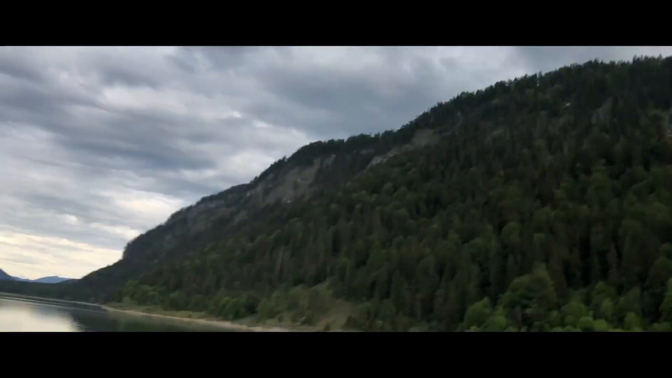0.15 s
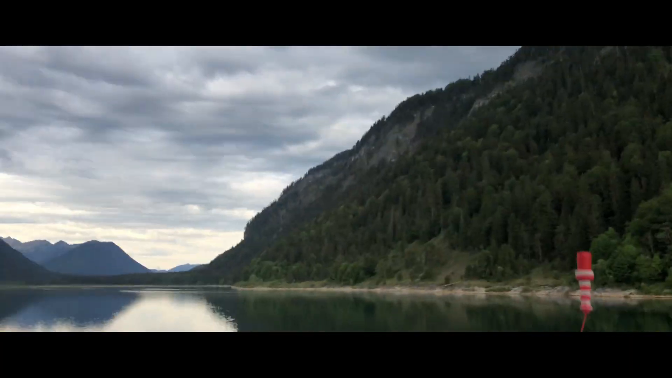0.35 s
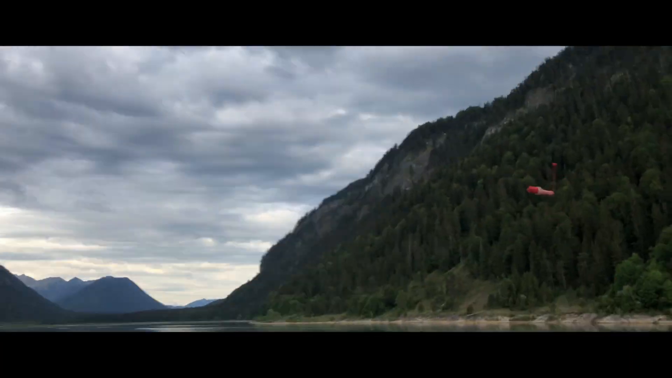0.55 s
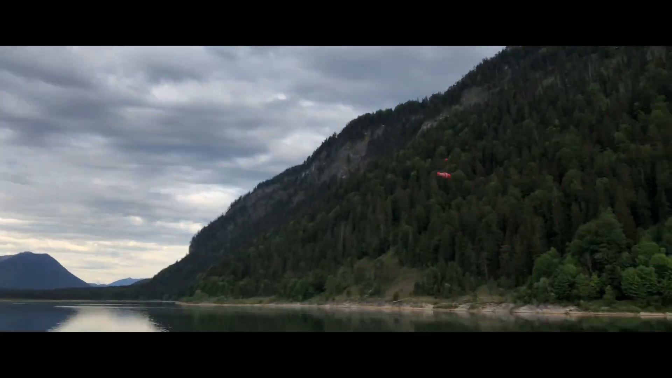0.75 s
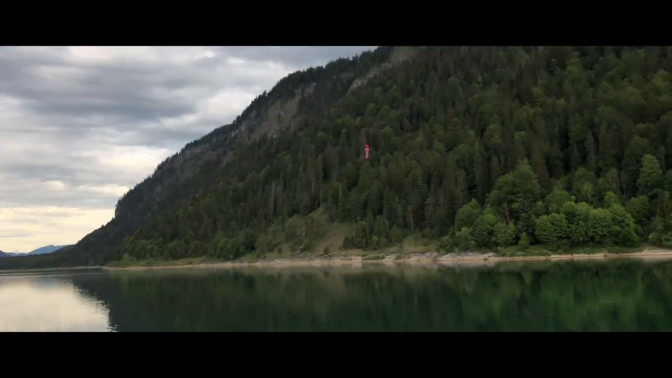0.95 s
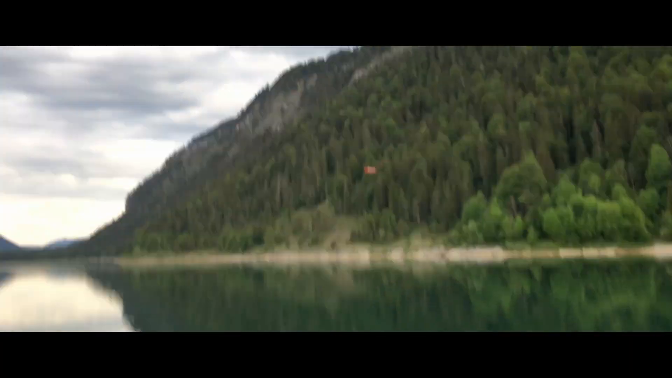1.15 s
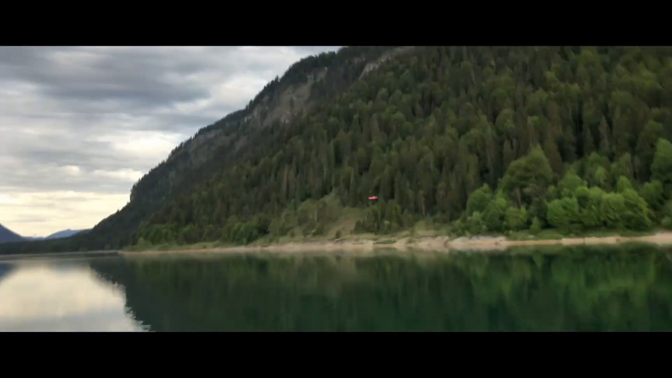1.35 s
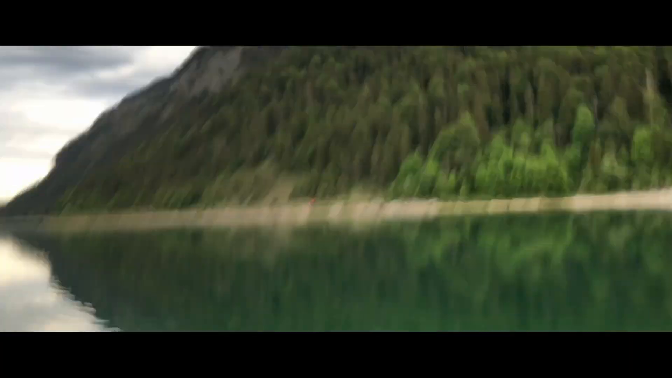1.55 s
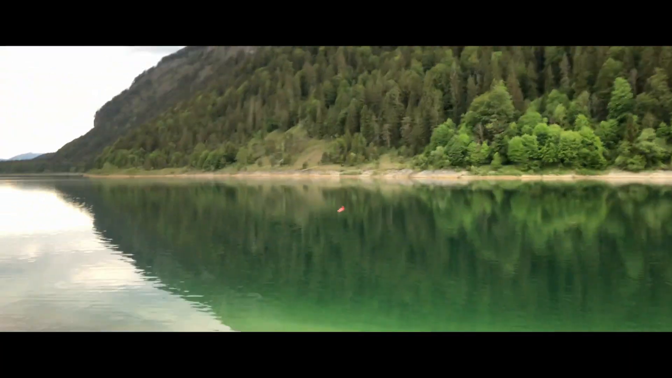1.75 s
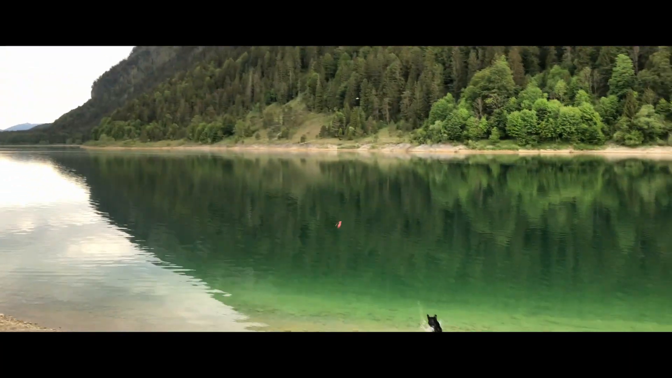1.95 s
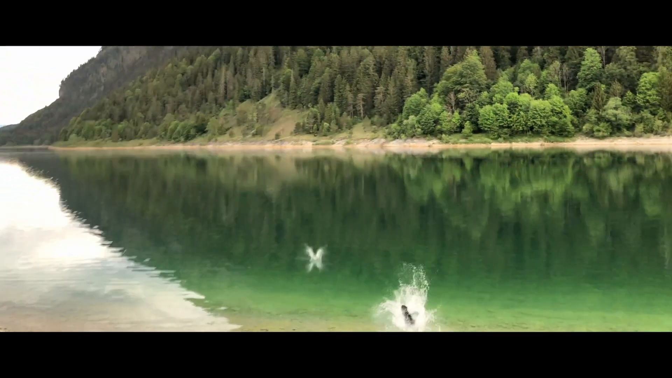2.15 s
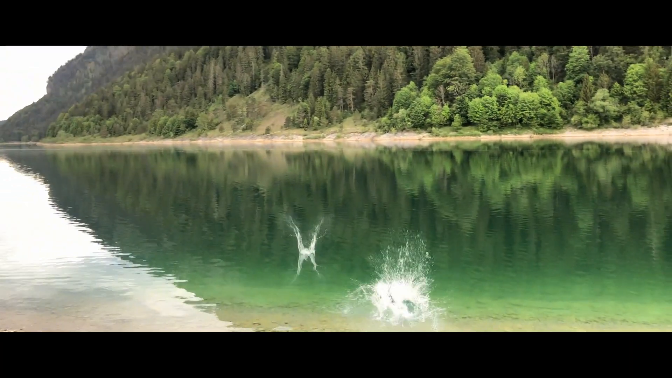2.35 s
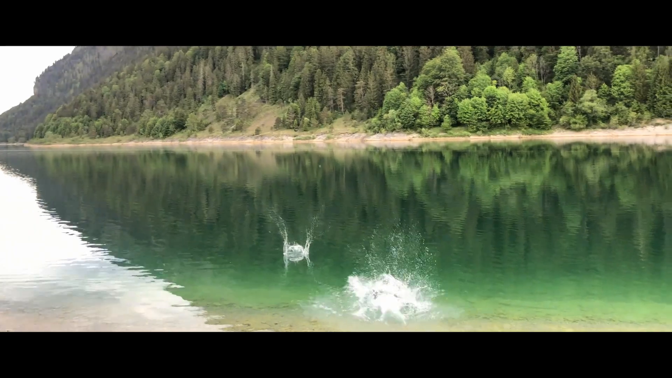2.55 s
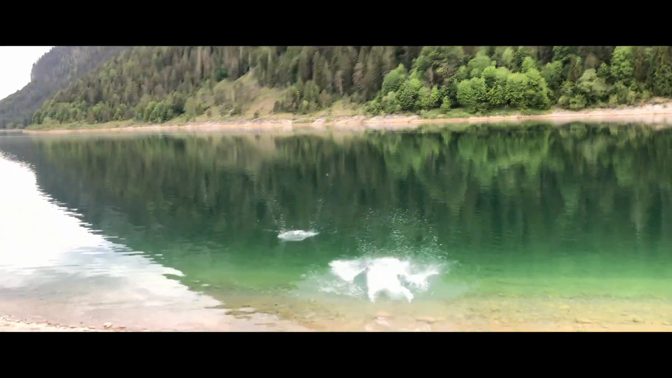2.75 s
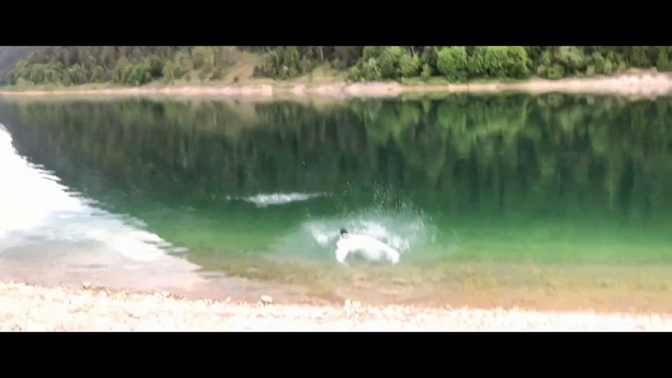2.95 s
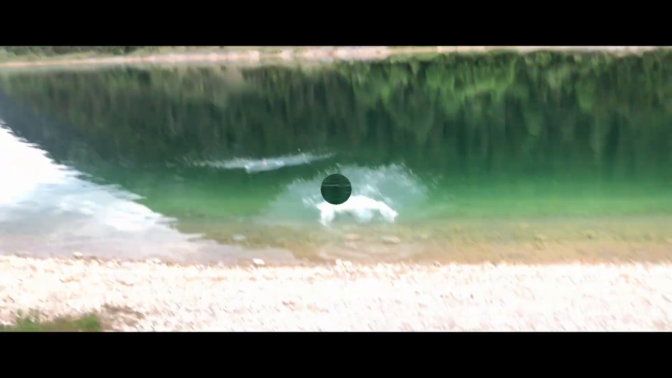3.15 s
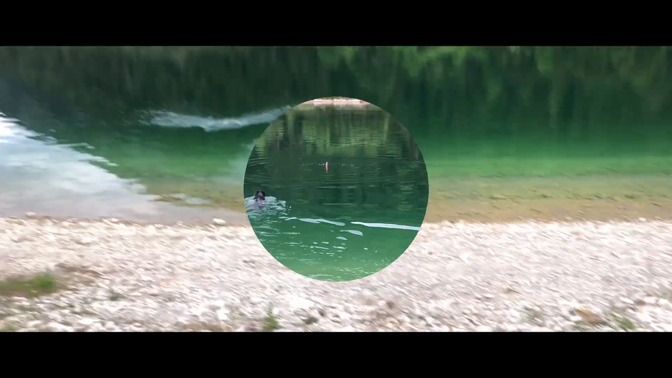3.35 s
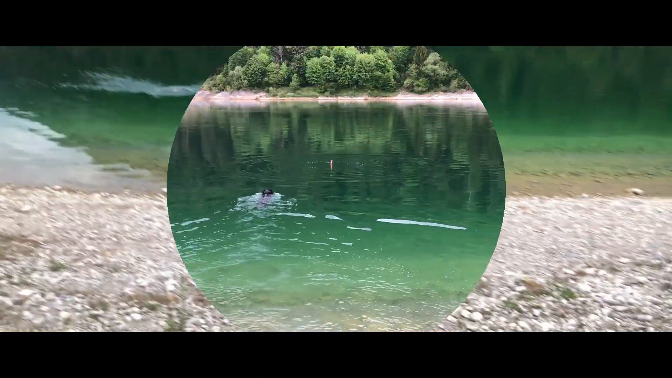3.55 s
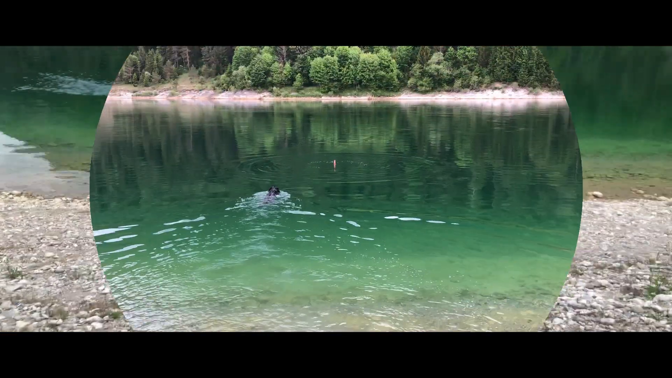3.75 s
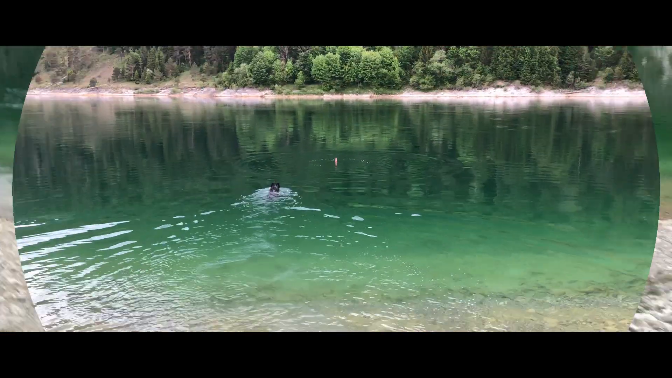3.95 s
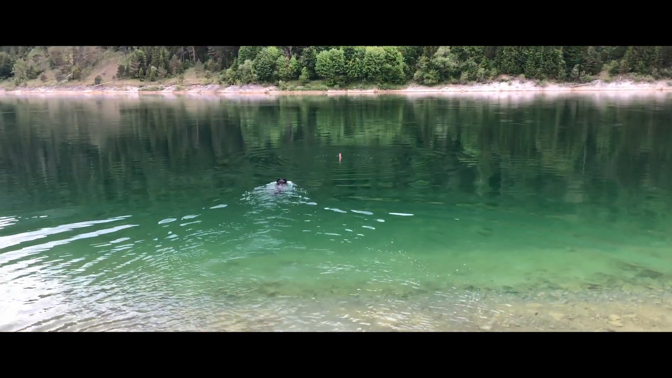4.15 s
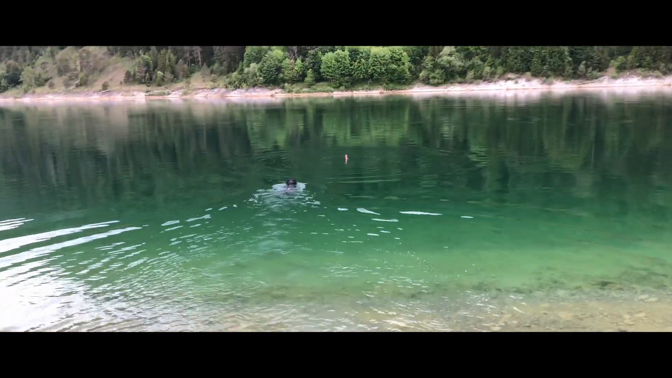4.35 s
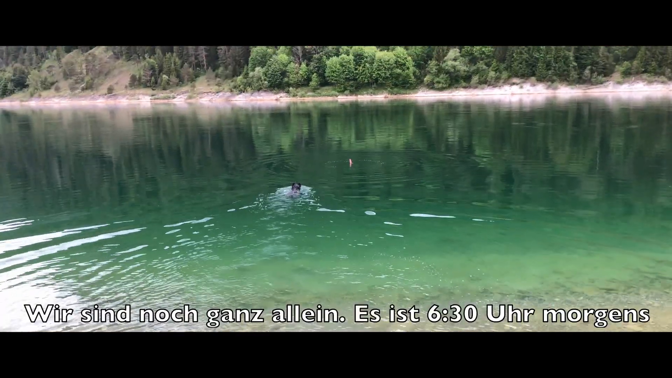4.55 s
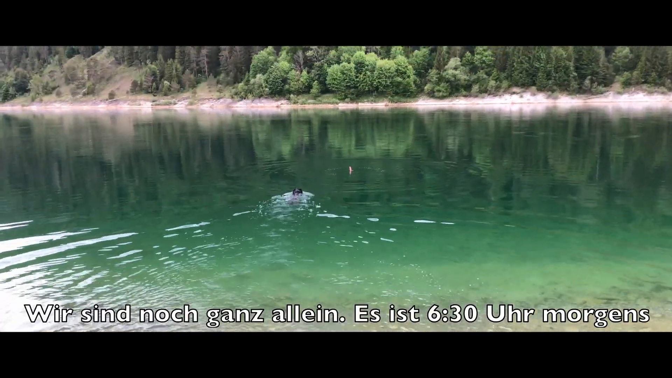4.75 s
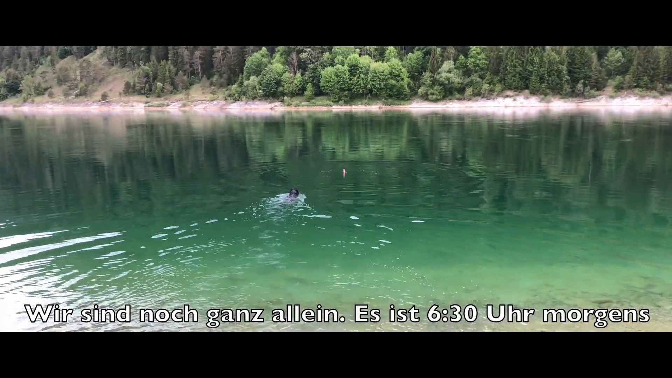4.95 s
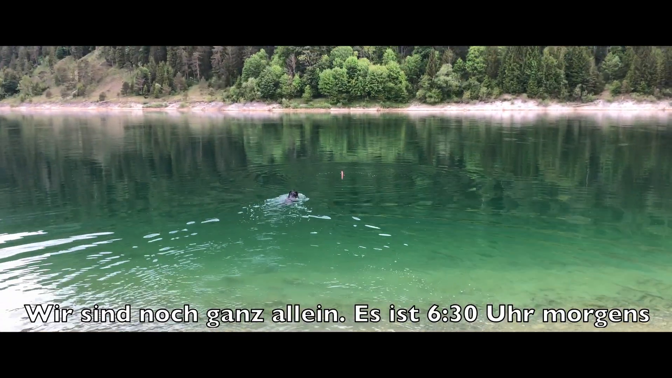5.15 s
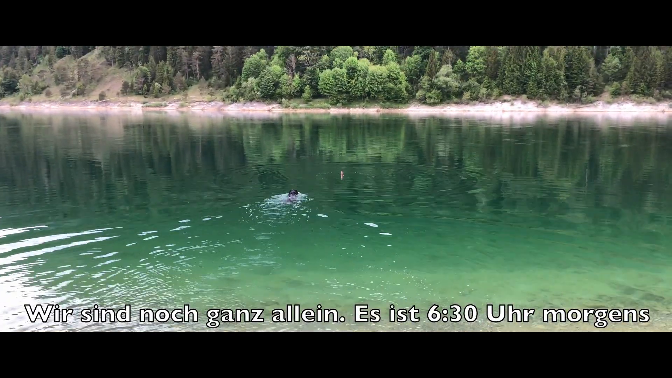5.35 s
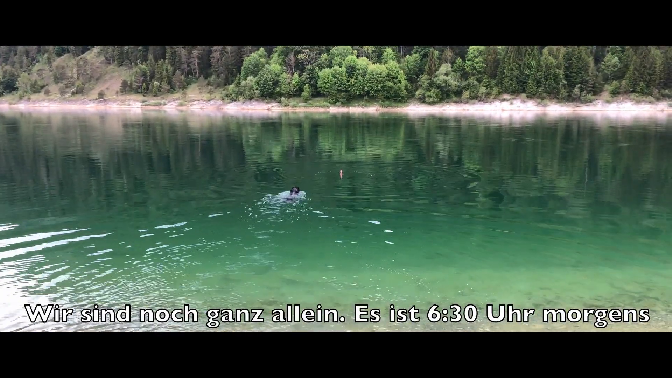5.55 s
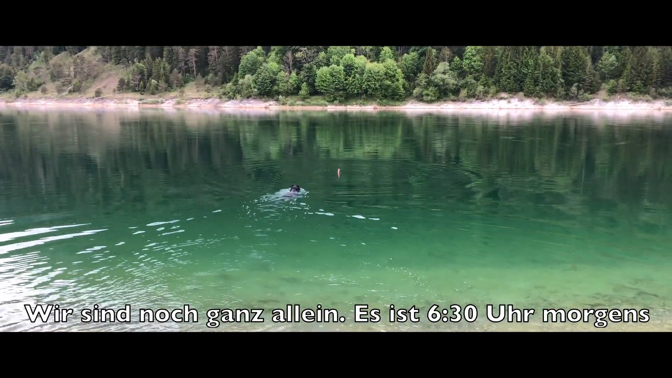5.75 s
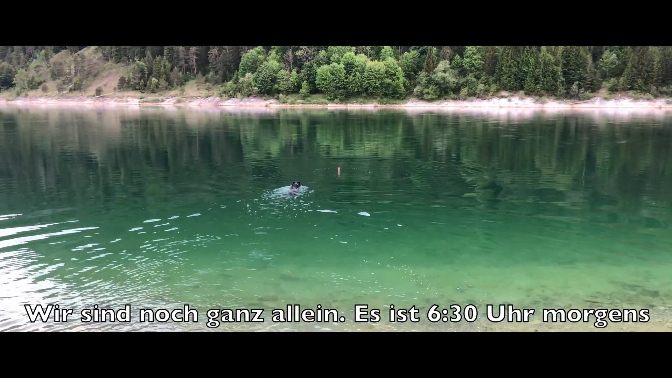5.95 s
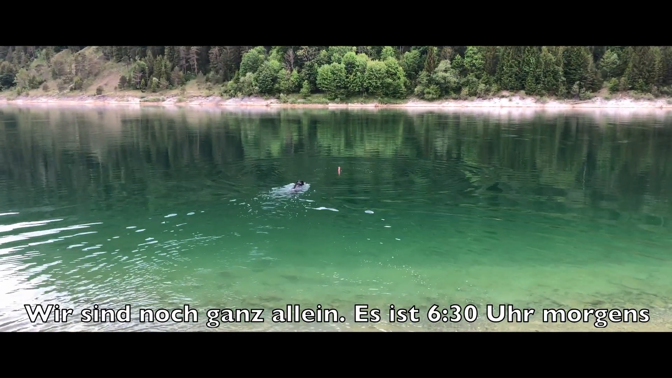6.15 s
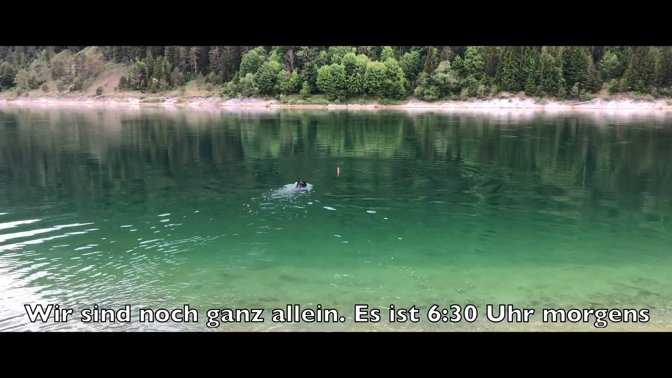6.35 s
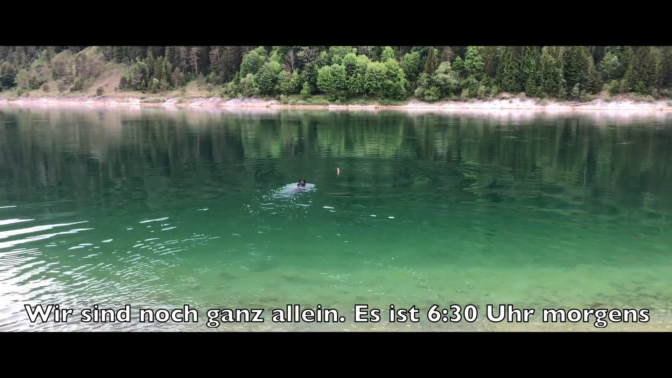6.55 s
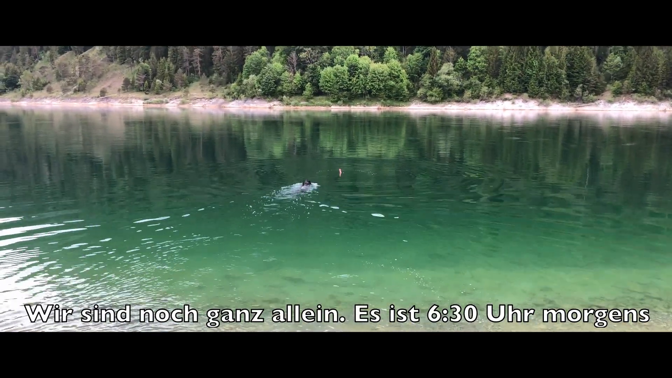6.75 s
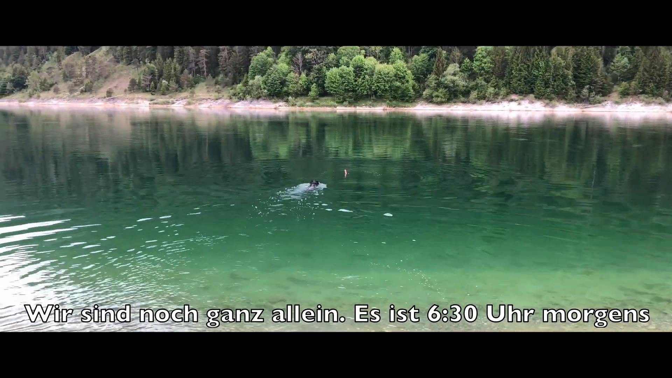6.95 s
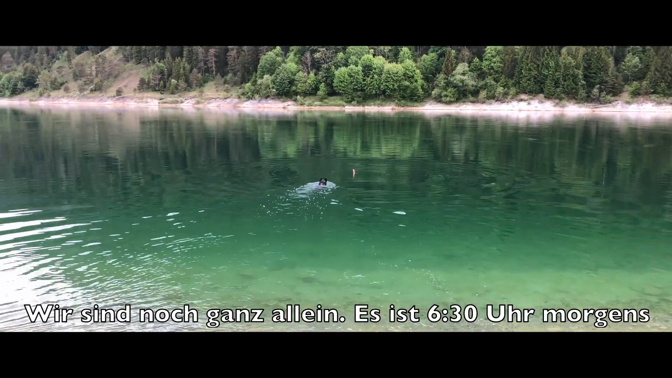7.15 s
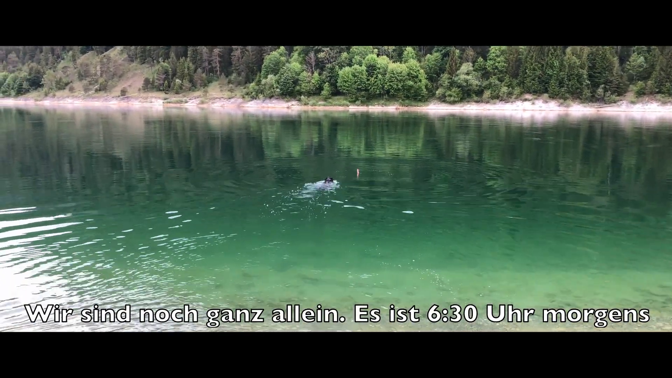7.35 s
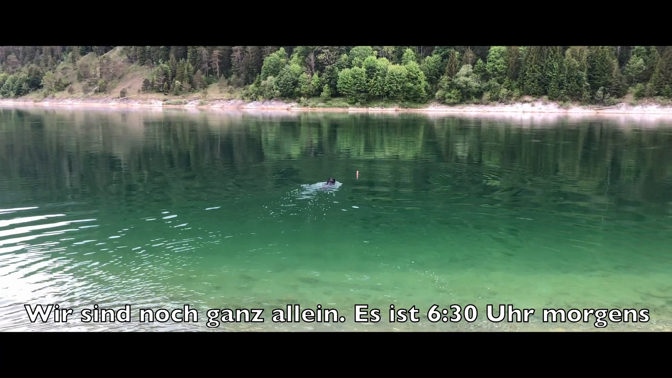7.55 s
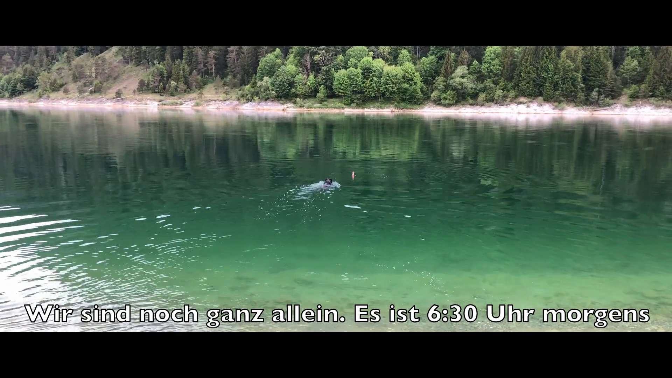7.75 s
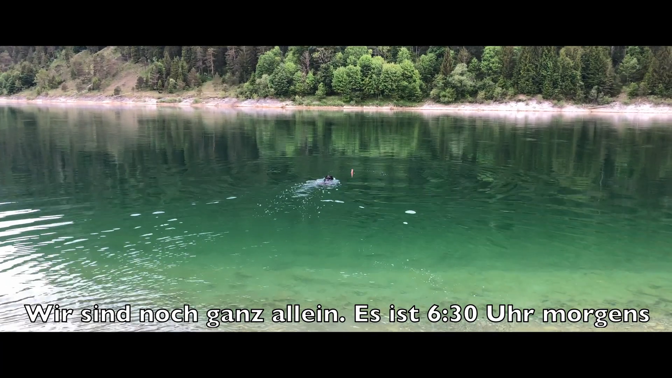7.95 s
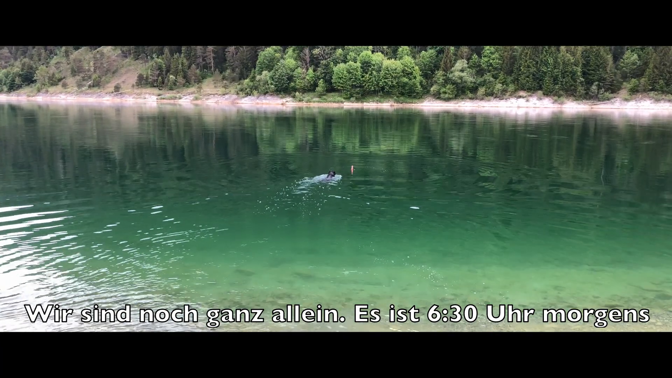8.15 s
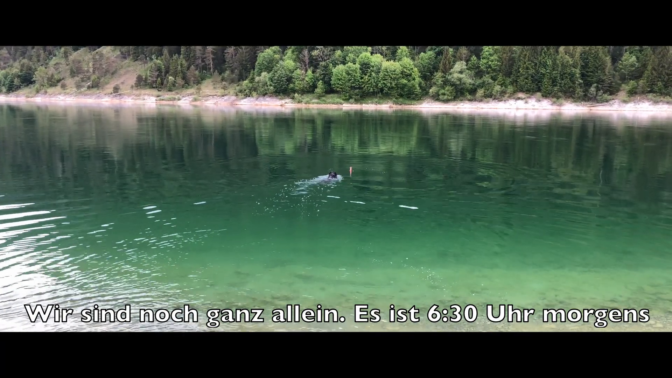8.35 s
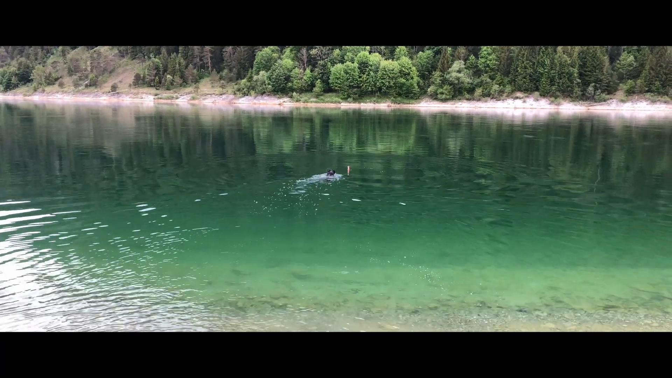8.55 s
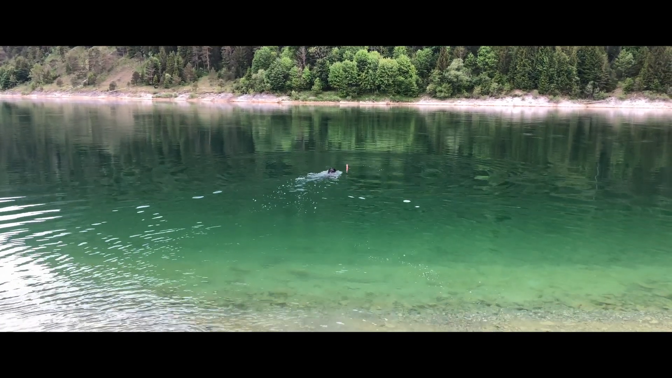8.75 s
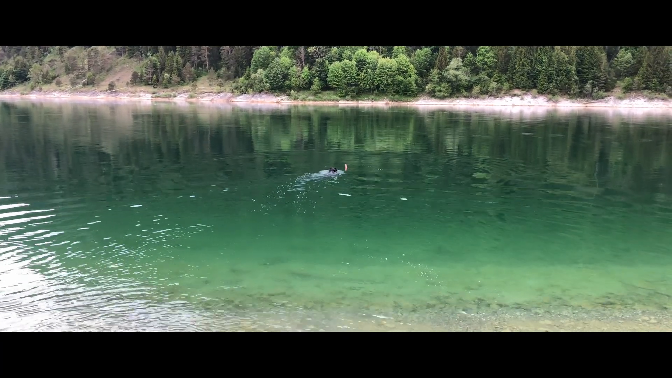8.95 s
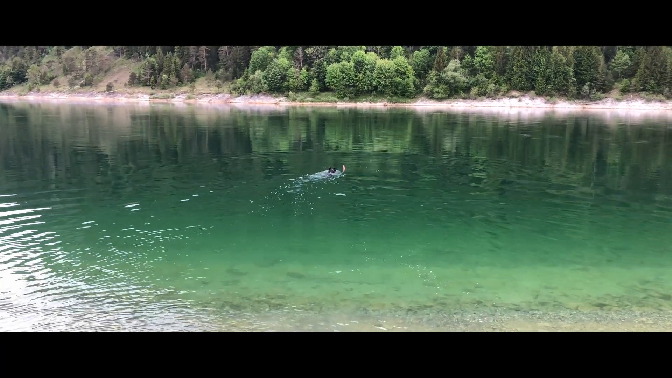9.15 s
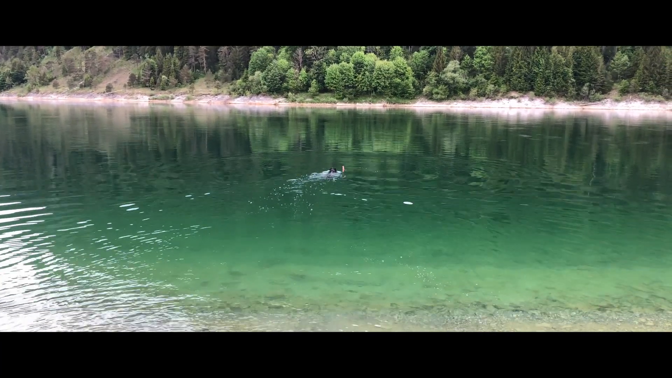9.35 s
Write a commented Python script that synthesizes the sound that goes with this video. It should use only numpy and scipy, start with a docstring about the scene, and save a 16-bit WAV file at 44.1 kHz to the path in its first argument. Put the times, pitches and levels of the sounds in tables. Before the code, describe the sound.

A dog sprints across stones, knocking pebbles brightly and grinding gravel, then plunges with deep gulps, foam and pattering spray. The rush cuts off suddenly to a soft, open lakeside: irregular paw ripples, tiny bubbles, single drips and short gurgling breaths at the waterline. Distant birds whistle with a wooded echo over still air and a low faint drone. Single microphone.

```python
"""Pebbles clack and crunch under a dog racing over a beach after a thrown toy, then it plunges into a calm lake.
Struck stones are short ringing modes; gravel, churned water and falling spray are swarms of ringing grains.
The rush cuts off, and the dog is swimming farther out: about once a second it huffs at the waterline, in puffs
of banded noise with a gurgle of rising tones. Its paws stir up bubbles and drops, and faint birds whistle.
A low distant drone and still air, both filtered noise, lie under it all. One microphone."""
import sys
import numpy as np
from scipy import signal
from scipy.io import wavfile

SR = 44100
rng = np.random.default_rng(int(sys.argv[2]) if len(sys.argv) > 2 else 0)


def output_pcm(signal):
    """Save a mono or channel-first signal as 16-bit PCM at the path in sys.argv[1].

    Samples are clipped to [-1, 1] before scaling.
    """
    pcm = np.clip(np.atleast_2d(signal).T, -1, 1) * 32767
    wavfile.write(sys.argv[1], SR, np.round(pcm).astype(np.int16))


N = 414981
TIME = np.arange(N) / SR
CUT_S = 3.712   # the run gives way to the swim
CUTOFF_HZ = 16000   # top of the microphone's range

# Colours here and below are relative, and levels are set before the trims where they are used.
# Colour of low thuds on the microphone and in the water. Each row: frequency in Hz, density in dB per Hz.
THUD_COLOUR = [(25, -24), (45, -2.5), (65, 0.5), (120, -6.5), (200, -16), (400, -21)]
# Colour of pattering drops. Each row: frequency in Hz, density in dB per Hz.
PATTER_COLOUR = [(2500, -10), (4000, 4.5), (6000, 2), (10000, -6.5), (16000, -19.5)]
# The dog's huffs. Each row: crest in seconds, rise and fall in seconds (to 1/e of the crest, nearly a bell),
# level in dB, tilt in dB per octave about 1 kHz.
HUFF_ROWS = [(3.786, 0.018, 0.03, -30, -2), (4.789, 0.02, 0.029, -32.5, 0.5),
             (5.434, 0.025, 0.035, -31.5, 1.5), (6.330, 0.034, 0.055, -36.5, -3.5),
             (7.295, 0.025, 0.046, -34.5, -4.5), (8.228, 0.024, 0.047, -37, -6),
             (9.245, 0.051, 0.065, -42.5, -4)]


def from_db(db):
    """Decibels to gain."""
    return 10 ** (np.asarray(db) / 20)


def rms_one(x):
    """Scale to unit power."""
    return x / np.sqrt(np.mean(x ** 2) + 1e-20)


def until(s, fade):
    """Open up to a moment, then closing over the fade in seconds."""
    return np.clip((s - TIME) / fade + 1, 0, 1)


def add(out, s, sound):
    """Mix a short sound in at a moment."""
    i = max(int(s * SR), 0)
    out[i:i + len(sound)] += sound[:max(N - i, 0)]


def swells(events, attack_s, release_s, rest_db=-120):
    """Gain of events (s, hold s, dB) that rise and die at 20 dB per attack or release, above a resting level."""
    t = TIME[::44]   # about a millisecond apart
    s, hold, db = np.transpose(events)[:, :, None]
    away = np.maximum(s - t, 0) / attack_s + np.maximum(t - s - hold, 0) / release_s
    event_power = from_db(db - 20 * np.minimum(away, 10)) ** 2
    power = from_db(rest_db) ** 2 + np.sum(event_power, axis=0)
    return np.interp(TIME, t, np.sqrt(power))


def drift(per_s):
    """Slow chance with a spread of about 1, drawn anew so many times a second."""
    return np.interp(TIME * per_s, np.arange(4096), rng.standard_normal(4096))


def bands_of(spectrum):
    """Third-octave centres that a spectrum covers, with their gains; total power 1."""
    hz, db = np.transpose(spectrum)
    thirds = 25 * 2 ** (np.arange(29) / 3)
    centres = thirds[(thirds >= hz[0]) & (thirds <= hz[-1] * 1.1)]
    density = from_db(np.interp(np.log(centres), np.log(hz), db))
    gain = density * np.sqrt(centres)   # a higher band is wider in Hz
    return zip(centres, gain / np.linalg.norm(gain))


def band_noise(hz, octaves=1 / 3):
    """Noise in one band."""
    edges = hz * 2 ** (np.array([-.5, .5]) * octaves)
    band = signal.butter(2, edges, "band", fs=SR, output="sos")
    return rms_one(signal.sosfilt(band, rng.random(N) - .5))


def noise(spectrum):
    """Smooth noise of a given colour."""
    return sum(gain * band_noise(hz) for hz, gain in bands_of(spectrum))


def ring(clicks, hz, cycles):
    """A resonance that dies by 60 dB in so many cycles."""
    r, w = from_db(-60 * hz / (cycles * SR)), 2 * np.pi * hz / SR
    return signal.lfilter([1, 0, -1], [1, -2 * r * np.cos(w), r * r], clicks + 1e-18)


def random_clicks(per_s, spread_db):
    """Impacts at random moments: with a spread above 0, many small and a few large."""
    draw = rng.random(N) * SR / per_s
    at = np.flatnonzero(draw < 1)
    size_db = spread_db * np.minimum(-np.log(draw[at]), 5)
    clicks = np.zeros(N)
    clicks[at] = from_db(size_db) * (-1) ** at
    return clicks


def grains(spectrum, per_s, spread_db, cycles):
    """A swarm of small ringing things, dealt to pitches across a spectrum."""
    clicks, bands = random_clicks(per_s, spread_db), list(bands_of(spectrum))
    dealt = rng.integers(0, len(bands), N)
    return sum(gain * rms_one(ring(clicks * (dealt == k), hz, cycles)) for k, (hz, gain) in enumerate(bands))


def ping(hz, cycles, rise):
    """A tone that swells within a cycle and dies by 36 dB while it glides; a surfacing bubble glides up."""
    age = np.arange(int(cycles / hz * SR)) / SR * hz / cycles   # 0 to 1 over its life
    tone = np.sin(2 * np.pi * cycles * (age + rise * age ** 2 / 2))
    return tone * from_db(-36 * age) * (1 - np.exp(-age * cycles))


def whistle(length, start_hz, middle_hz, end_hz, db):
    """A soft-edged tone on an arc of pitch."""
    u = np.linspace(0, 1, int(length * SR))
    hz = np.polyval(np.polyfit([0, .5, 1], [start_hz, middle_hz, end_hz], 2), u)
    return from_db(db) * np.abs(np.sin(np.pi * u)) ** .5 * np.sin(2 * np.pi * np.cumsum(hz) / SR)


def lakeside():
    """Still air and a low, wavering drone from far away, both as steady noise under a gain."""
    # Colour of the still air. Each row: frequency in Hz, density in dB per Hz.
    air_colour = [(15, -36), (25, -2), (64, 0.5), (114, 0), (249, 0), (363, -3), (775, -10.5), (1020, -1),
                  (1370, -11), (2160, -10), (2760, -36), (3430, -13.5), (5140, -18), (14800, -24),
                  (16000, -26)]
    # Level of the far drone. Each row: time in seconds, level in dB.
    drone_rows = [(3.7, -61), (4.6, -68), (4.8, -54.5), (6.5, -56), (6.8, -64), (7.1, -58), (7.9, -57),
                  (8.3, -50.5), (9.4, -64.5)]
    s, db = np.transpose(drone_rows)
    drone = from_db(np.interp(TIME, s, db)) * band_noise(62.5, octaves=0.27)
    return from_db(-53.0) * noise(air_colour) + drone


def buffeting():
    """Low thuds on the microphone over a breeze: swelling low noise that fades out after the plunge."""
    # Footfalls and air shaking the microphone. Each row: start in seconds, length in seconds, level in dB.
    buffet_rows = [(0, 0.0034, -20.5), (.33, 0.087, -32), (.63, 0.015, -33), (.73, .02, -38),
                   (.92, 0.046, -39), (1.11, 0.037, -29.5), (1.2, 0.052, -28), (1.48, .012, -31.5),
                   (1.56, 0.018, -35), (1.698, 0.0088, -24.5), (1.928, .008, -28.5), (2.38, 0.067, -22.5)]
    shake = swells(buffet_rows, attack_s=0.039, release_s=0.054, rest_db=-46.5)   # rest: the breeze
    return from_db(-4.5) * shake * until(2.6, fade=0.76) * noise(THUD_COLOUR)


def beach():
    """Each foot grinds the gravel in clumps and shoves the bed beneath it, while the toy is swung."""
    # Feet landing and sliding. Each row: start in seconds, slide in seconds,
    # crunch of the stones in dB, scuff of the bed in dB, fine grit in dB.
    step_rows = [(0.033, 0.014, -31, -32.5, -25.5), (0.137, 0.0077, -30, -28, -33),
                 (0.318, 0.034, -30, -29.5, -33), (.362, 0.084, -33, -27, -31.5),
                 (.472, 0.016, -28.5, -27, -24.5), (.615, 0.1, -32.5, -32.5, -36),
                 (0.765, 0.025, -29.5, -32.5, -27), (0.937, 0.0089, -41, -31.5, -40),
                 (1.085, 0.018, -39.5, -44.5, -55), (1.189, .006, -33.5, -39, -38),
                 (1.236, 0.01, -33.5, -34.5, -32), (1.343, 0.0068, -25, -36, -35),
                 (1.382, 0.017, -28.5, -51, -31), (1.497, 0.06, -35, -36, -52),
                 (1.651, 0.018, -23, -35.5, -42), (1.724, 0.0074, -22, -47, -36),
                 (1.758, 0.0087, -21.5, -27.5, -43), (1.83, 0.15, -28.5, -35.5, -37)]
    # Loose gravel settling between the steps: crunch, scuff and grit in dB.
    settling_db = [-41.5, -41, -41.5]
    # Colours of stones, bed and grit. Each row: frequency in Hz, density in dB per Hz.
    crunch_colour = [(1200, -5), (2000, -8), (2600, -3), (3400, -1), (4400, 0.5), (5200, -1), (6400, -13)]
    scuff_colour = [(150, -1), (330, 3), (600, -2), (950, 2), (1400, -4.5), (2000, -13), (2500, -13)]
    grit_colour = [(7000, -15), (10000, 15.5), (13000, 9.5), (16000, 7)]
    # Whistle of the swung toy: start in seconds, length in seconds, start, middle and end in Hz, level in dB.
    swing_row = (.335, .095, 2500, 2520, 2420, -33)
    s, slide, *levels = np.transpose(step_rows)
    crunch, scuff, fine = [swells(np.c_[s, slide, db], attack_s=.018, release_s=0.043, rest_db=rest_db)
                           for db, rest_db in zip(levels, settling_db)]
    stones = from_db(-2.5) * crunch * grains(crunch_colour, per_s=4500, spread_db=5.0, cycles=12.0)
    grit = from_db(-5) * fine * grains(grit_colour, per_s=2500, spread_db=3.5, cycles=6)
    bed = from_db(-2.23) * scuff * grains(scuff_colour, per_s=3000, spread_db=3.5, cycles=9.4)
    clumps = from_db(2.4 * drift(160))
    out = ((stones + grit) * clumps + bed) * until(1.934, fade=0.031)
    swing_s, *swing_note = swing_row
    add(out, swing_s, whistle(*swing_note))
    return out


def pebbles(t60=0.0015, rattle_db=-20, rattle_t60=0.035, contact_s=0.00014):
    """Each knock is a few very short stone modes and a rattle of the neighbours; stones in the bed knock dully."""
    # Pebbles knocking together. Each row: start in seconds, level in dB, nominal ring in Hz.
    pebble_rows = [(.041, -11.5, 4730), (.055, -9.5, 7240), (.077, -9, 8850), (0.099, -7.5, 3900),
                   (.143, -10.5, 2300), (.175, -12.5, 9400), (.214, -15.5, 5100), (.276, -9.5, 4240),
                   (.406, -16, 2410), (.468, -4.5, 7950), (.473, -6.5, 3670), (0.489, -5.5, 4240),
                   (.504, -3.5, 5600), (.510, -12, 5270), (.531, -13.5, 1500), (.567, -10, 3600),
                   (.621, -12, 4060), (.654, -11.5, 4530), (0.692, -16.5, 5100), (0.782, -9.5, 3750),
                   (.937, -13, 3330), (1.068, -19, 5600), (1.162, -13, 1420), (1.347, -4, 3500),
                   (1.418, -5, 5360), (1.425, -11, 4600), (1.457, -11, 3280), (1.652, -6.5, 3600),
                   (1.662, -18, 4370), (1.707, -9, 3700), (1.733, -5.5, 4370), (1.765, -6, 3420),
                   (1.947, -3, 3470), (1.968, -1.5, 2750), (1.985, -2.5, 3580), (2.026, -1.5, 1300),
                   (2.028, -3, 3870), (2.321, -5, 5670), (2.326, -4.5, 2360)]
    # Dull knocks of stones pressed into the bed. Each row: start in seconds, level in dB, starting pitch in Hz,
    # cycles of ring.
    knock_rows = [(0.148, -30, 346, 11), (.192, -26.5, 1140, 26), (.385, -23, 805, 5.9),
                  (.432, -24, 480, 11.4), (1.136, -19.5, 600, 4.1), (1.237, -17.5, 710, 5.9),
                  (1.268, -21, 700, 5.5), (1.475, -13.5, 580, 5.6)]
    out, t = np.zeros(N), np.arange(SR // 25) / SR
    for s, db, hz in pebble_rows:
        modes = hz * np.array([1.027, 0.675, 1.427, 2.27]) * (1 + 0.049 * rng.standard_normal(4))
        mode_gains = from_db([7.5, 0.5, 2, -5.0]) * (modes < CUTOFF_HZ)
        knock = mode_gains @ np.sin(2 * np.pi * np.outer(modes, t))
        knock *= from_db(-60 * t / (t60 + 3 / hz))   # lower stones ring longer
        knock *= 1 - np.exp(-(t / contact_s) ** 2)   # soft onset of the contact
        rattle = rms_one(ring(rng.standard_normal(len(t)), hz, 2.7))
        rattle *= from_db(rattle_db - 60 * t / rattle_t60)
        add(out, s, from_db(db + 1) * (knock / np.abs(knock).max() + rattle))
    for s, db, hz, cycles in knock_rows:
        add(out, s, from_db(db + 4.0) * ping(hz, cycles, rise=-0.52))
    return out


def plunge(rumble_db=-18):
    """The air cavity gulps and rumbles, the torn water churns with bubbles, and the spray falls back as fine drops."""
    # The dog bounds through the shallows and plunges in. Each row: start in seconds, length in seconds,
    # air cavity in dB, churning water in dB, spray in dB.
    splash_rows = [(1.83, 0.1, -34, -49, -31.5), (1.954, 0.11, -36, -31.5, -29.5),
                   (2.14, 0.086, -31.5, -27, -26.5), (2.254, 0.017, -22.5, -32, -27),
                   (2.323, 0.23, -26, -28, -29.5), (2.616, 0.018, -22, -23, -32),
                   (3.007, 0.026, -35.5, -26, -52), (3.683, .02, -40, -40, -41)]
    # Thrown-up water falling back in one long swell, a row each for cavity, churn and spray.
    # Each row: level in dB, seconds to die by 20 dB.
    fallback_rows = [(-35, 1.3), (-26, 1.8), (-24.5, .85)]
    # Colours of cavity, churn and spray. Each row: frequency in Hz, density in dB per Hz.
    cavity_colour = [(70, -20), (110, -3), (150, -5.5), (220, 6.5), (320, 2), (450, -12), (700, -14)]
    churn_colour = [(250, -6), (330, -2.5), (450, -7.5), (700, 1), (900, -0.5), (1250, 3.5), (1600, -4),
                    (2000, -10.5), (2500, -25), (4000, -25)]
    spray_colour = [(1180, -15), (2000, 3), (2600, -13), (3280, 4.5), (5880, -5.5), (8550, -10.5),
                    (9920, -23), (15100, -12), (16000, -19)]
    s, length, *levels = np.transpose(splash_rows)
    layers = []
    for db, (fall_db, fall_s) in zip(levels, fallback_rows):
        splash = swells(np.c_[s, length, db], attack_s=0.062, release_s=0.17)
        fallback = swells([(2.753, 0.21, fall_db)], attack_s=0.43, release_s=fall_s)
        layers.append(np.hypot(splash, fallback))   # powers add
    cavity, churn, spray = layers
    gulps = from_db(-0.5) * grains(cavity_colour, per_s=700, spread_db=2.5, cycles=10.5)
    rumble = from_db(rumble_db) * noise(THUD_COLOUR)
    foam = from_db(-0.5) * churn * grains(churn_colour, per_s=4500, spread_db=0.0, cycles=11)
    drops = from_db(-1.3) * spray * grains(spray_colour, per_s=12000, spread_db=0.5, cycles=10.2)
    # the heavy drops fly highest, so their patter outlasts the fine spray
    patter = from_db(-26.0) * np.sqrt(spray) * grains(PATTER_COLOUR, per_s=880, spread_db=5.0, cycles=4.1)
    return cavity * (gulps + rumble) + foam + drops + patter


def single_bubbles(splat_db=-19, splat_t60=0.066):
    """The largest gulps and the nearest drops: gliding tones, each with a small splat of ringing noise."""
    # Single bubbles and drops. Each row: start in seconds, level in dB, starting pitch in Hz, cycles of ring.
    bubble_rows = [(1.955, -19, 287, 15), (2.069, -12.5, 698, 20), (2.084, -9.5, 640, 17.4),
                   (2.240, -14.5, 274, 25), (2.618, -19, 275, 9), (3.799, -16, 1810, 13),
                   (4.015, -23, 3060, 26), (4.065, -34.5, 526, 43), (4.425, -34, 528, 22),
                   (5.560, -31, 760, 43), (5.604, -31.5, 850, 54), (5.909, -22.5, 2090, 26),
                   (5.934, -33, 1080, 20), (5.953, -28.5, 3300, 22), (5.98, -21, 2230, 3.6),
                   (6.090, -29, 1600, 9), (6.162, -24, 1590, 9.2), (6.284, -25.5, 3380, 31),
                   (6.426, -32, 1570, 20), (6.547, -23.5, 5330, 19), (6.805, -26, 3040, 39),
                   (6.806, -27.5, 1110, 30), (6.885, -24, 1010, 12), (6.888, -23, 12100, 29),
                   (7.013, -23.5, 4030, 9), (7.084, -28, 4200, 25), (7.177, -29, 3220, 27),
                   (7.811, -19, 2180, 10), (8.357, -30, 1270, 25), (8.571, -25, 1640, 17),
                   (8.728, -33, 2190, 28), (8.872, -23, 1940, 10), (9.087, -32, 386, 9.5),
                   (9.212, -26, 580, 13), (9.284, -32.5, 2180, 30)]
    # One big bubble surfacing: start in seconds, length in seconds, start, middle and end in Hz, level in dB.
    bloop_row = (3.962, .024, 850, 1180, 1800, -29)
    out, t = np.zeros(N), np.arange(SR // 40) / SR
    for s, db, hz, cycles in bubble_rows:
        splat = rms_one(ring(rng.standard_normal(len(t)), hz, 4.1))
        splat *= from_db(splat_db - 60 * t / splat_t60)
        add(out, s, from_db(db - 1.0) * ping(hz, cycles, rise=0.24))
        add(out, s, from_db(db) * splat)
    bloop_s, *bloop_note = bloop_row
    add(out, bloop_s, whistle(*bloop_note))
    return out


def paddling(count=700):
    """Each paw stroke and each huff stirs up a wash of tiny bubbles, with a trickle of clearer plips and soft droplets."""
    # Paw strokes, about three a second. Each row: start in seconds, length of the pull in seconds, level in dB.
    stroke_rows = [(3.72, 0.085, -41), (3.98, 0.07, -42.5), (4.31, 0.14, -43.5), (4.63, 0.21, -47),
                   (4.94, 0.063, -46), (5.26, 0.14, -52), (5.59, 0.047, -45), (5.95, 0.1, -49.5),
                   (6.25, 0.057, -41), (6.56, 0.062, -47.5), (6.89, .1, -44.5), (7.18, 0.054, -43),
                   (7.55, 0.079, -44.5), (7.87, 0.037, -47), (8.14, 0.16, -44.5), (8.49, 0.042, -47.5),
                   (8.85, 0.042, -45), (9.2, 0.25, -51)]
    # Colour of the lapping wash. Each row: frequency in Hz, density in dB per Hz.
    lap_colour = [(200, -2.5), (330, -5), (480, 5), (1000, -0.5), (1900, 0.5), (2700, -12), (3600, -9),
                  (5500, -12.5), (9000, -24), (16000, -59)]
    huff_stirs = [(s - rise, rise + fall, db - 12.5) for s, rise, fall, db, _ in HUFF_ROWS]
    stirs = list(stroke_rows) + huff_stirs
    stirred = swells(stirs, attack_s=0.15, release_s=0.19, rest_db=-54)   # rest: the wake between strokes
    plips = np.zeros(N)
    for when, pitch, size, length in rng.random((count, 4)):
        hz = 620 * 6.5 ** pitch
        plip = ping(hz, 12 + 24 * length, rise=.45)
        add(plips, CUT_S + when * (TIME[-1] - CUT_S), from_db(-17 * size ** .5) * plip)
    wash = grains(lap_colour, per_s=3600, spread_db=2.5, cycles=11.8)
    droplets = grains(PATTER_COLOUR, per_s=90, spread_db=2.6, cycles=12)
    return stirred * (from_db(-4.0) * wash + from_db(-6.0) * rms_one(plips) + from_db(-14.5) * droplets)


def huffs(sweep_s=0.0094, flutter_db=2.5, gurgle_db=2, count=14):
    """The dog blows out at the waterline: each puff opens from low to high and drives a gurgle of rising bubbles."""
    # Colour of the breath. Each row: frequency in Hz, density in dB per Hz.
    breath_colour = [(150, -21), (250, -12), (450, 1), (700, -3), (1200, 1), (2000, -5), (2600, -11.5),
                     (3300, -7.5), (5000, -17), (8400, -25.5), (16000, -62)]
    air, gurgle = np.zeros(N), np.zeros(N)
    t = np.arange(-SR // 5, SR // 5) / SR
    for hz, gain in bands_of(breath_colour):
        octave, blow = np.log2(hz / 1000), np.zeros(N)
        delay = sweep_s * min(octave, 1)   # no later above 2 kHz
        for s, rise, fall, db, tilt_db in HUFF_ROWS:
            shape = np.exp(-np.abs(t / np.where(t < 0, rise, fall)) ** 1.94)
            add(blow, s + t[0] + delay, shape * from_db(db + tilt_db * octave))
        air += gain * blow * band_noise(hz)
    for s, rise, fall, db, _ in HUFF_ROWS:
        for when, pitch, size in rng.random((count, 3)):
            hz = 420 * 2 ** (1.175 * when + pitch)   # later bubbles are smaller
            bubble = from_db(db + gurgle_db - 3.5 * size) * ping(hz, 19.7, rise=0.6)
            add(gurgle, s - rise + when * (rise + fall), bubble)
    return air * from_db(flutter_db * drift(160) - 0.25) + gurgle


def birds(flutter_db=5.0, chorus_db=-63, echo_t60=0.17, echo_db=-3, far_db=-59, count=110):
    """Near and far whistles, scattered by the wooded slope as a decaying noise echo, over a blurred chorus."""
    # Distant birds. Each row: start in seconds, length in seconds, start, middle and end in Hz, level in dB.
    bird_rows = [(4.298, 0.046, 3730, 3300, 2780, -53), (4.62, 0.066, 3280, 4000, 3620, -50),
                 (4.713, 0.029, 3600, 3150, 2700, -50), (4.904, 0.061, 3200, 3760, 3300, -54),
                 (5.097, 0.087, 2410, 3440, 2480, -48), (5.224, 0.067, 3230, 3580, 3150, -50),
                 (5.578, 0.034, 2800, 3130, 3600, -55), (5.72, 0.046, 2840, 3070, 3600, -55),
                 (7.482, 0.2, 3580, 3020, 3410, -52), (7.697, .04, 3400, 3150, 2740, -56),
                 (8.032, 0.039, 3730, 3420, 2830, -50), (8.13, .07, 3140, 3130, 3120, -52),
                 (9.09, .125, 3150, 4060, 3980, -55)]
    song = np.zeros(N)
    for s, *note in bird_rows:
        add(song, s, whistle(*note))
    for when, *pitches in rng.random((count, 4)):
        far_call = whistle(.05, *(2700 + 1600 * np.array(pitches)), far_db)
        add(song, CUT_S + when * (TIME[-1] - CUT_S), far_call)
    scatter = rng.standard_normal(SR // 2) * from_db(-60 * TIME[:SR // 2] / echo_t60)
    echo = signal.fftconvolve(song, scatter / np.linalg.norm(scatter))[:N]
    chorus = from_db(chorus_db + 2.5 * drift(11)) * band_noise(3380, octaves=0.42)
    direct = song * from_db(flutter_db * drift(140) - 2)
    return direct + from_db(echo_db) * echo + chorus


def scene():
    """The run and the plunge, then an abrupt change to the swim."""
    ashore = until(CUT_S, fade=0.0051)
    dash = pebbles() + beach() + buffeting() + plunge()
    swim = huffs() + paddling() + birds()
    mono = ashore * dash + (1 - ashore) * swim + single_bubbles() + lakeside()
    return np.array([mono, mono])


def record(dry, low_cut_hz=36):
    """The microphone drops the deepest bass, peaks stop at full scale and the top is cut."""
    bass_cut = signal.butter(3, low_cut_hz, "high", fs=SR, output="sos")
    top_cut = signal.ellip(10, .2, 80, CUTOFF_HZ, fs=SR, output="sos")
    thinned = signal.sosfilt(bass_cut, dry)
    return signal.sosfilt(top_cut, np.clip(thinned, -1, 1))


dry = scene()
out = record(dry)
output_pcm(out)
```